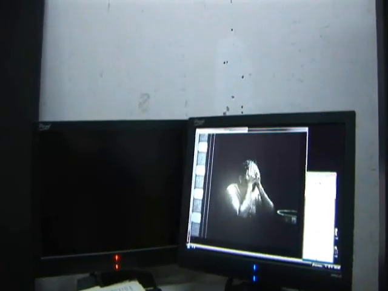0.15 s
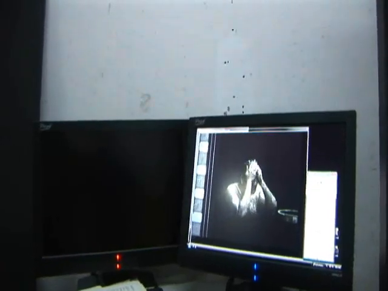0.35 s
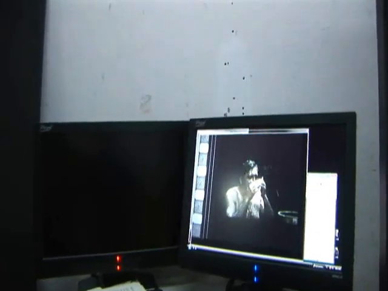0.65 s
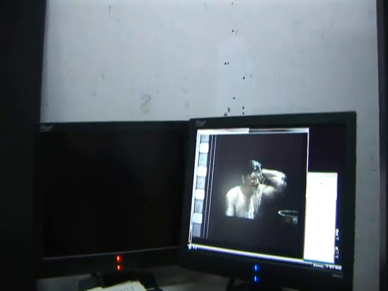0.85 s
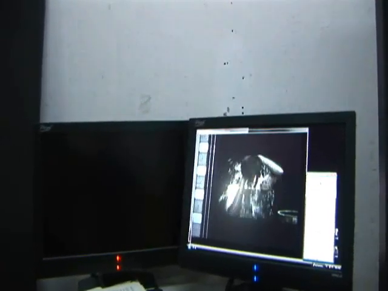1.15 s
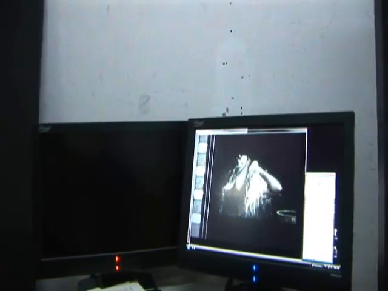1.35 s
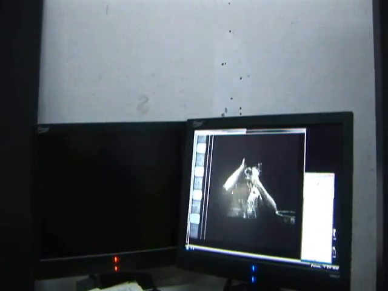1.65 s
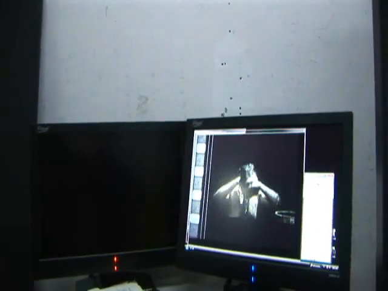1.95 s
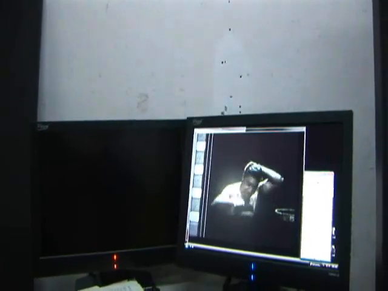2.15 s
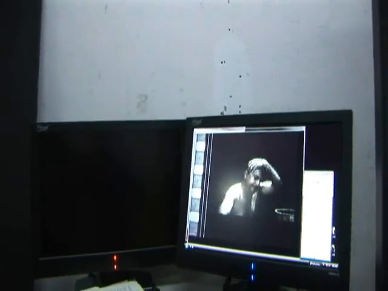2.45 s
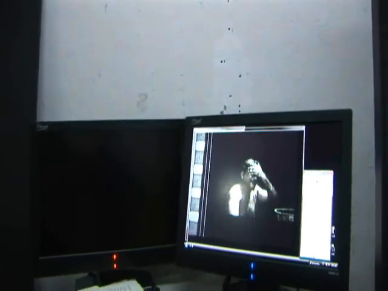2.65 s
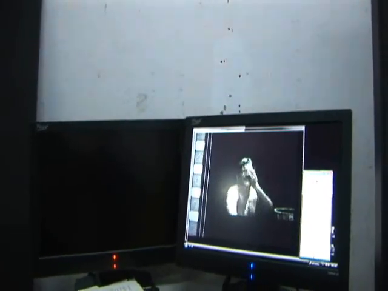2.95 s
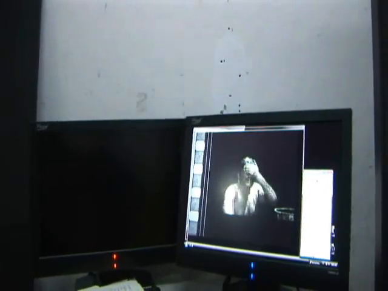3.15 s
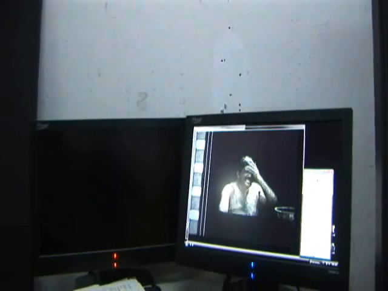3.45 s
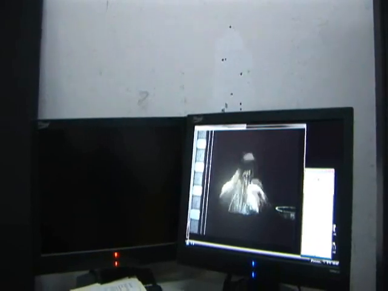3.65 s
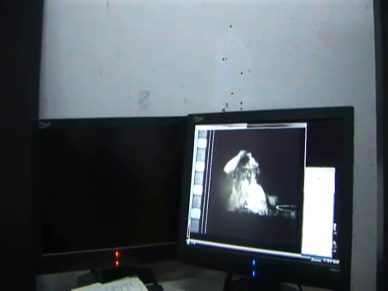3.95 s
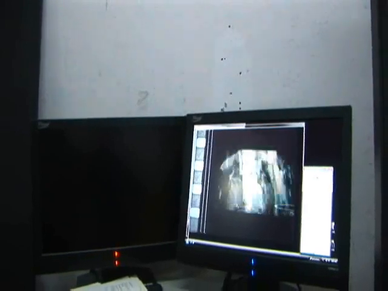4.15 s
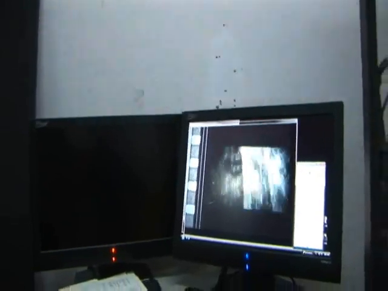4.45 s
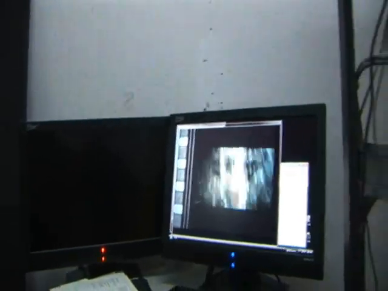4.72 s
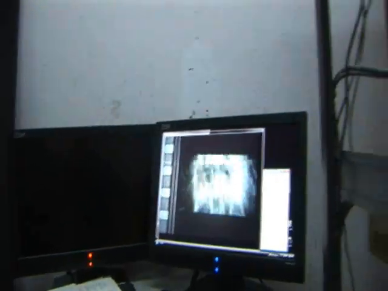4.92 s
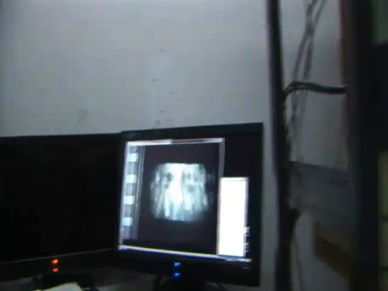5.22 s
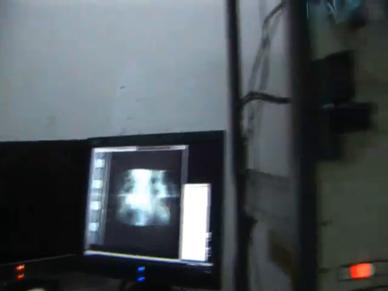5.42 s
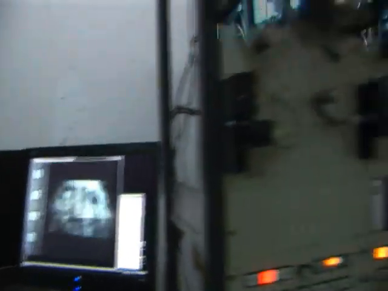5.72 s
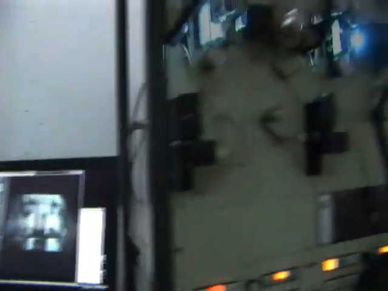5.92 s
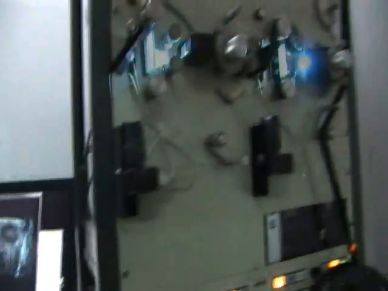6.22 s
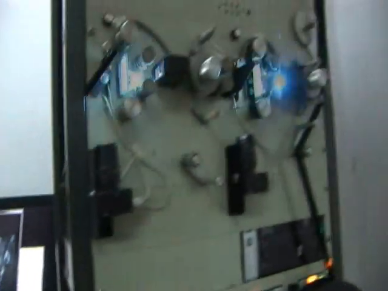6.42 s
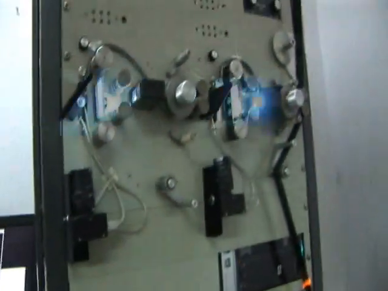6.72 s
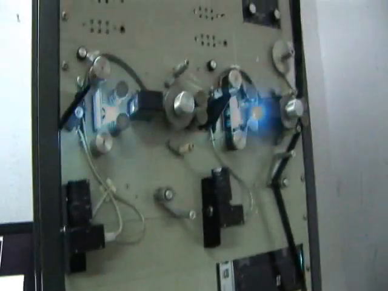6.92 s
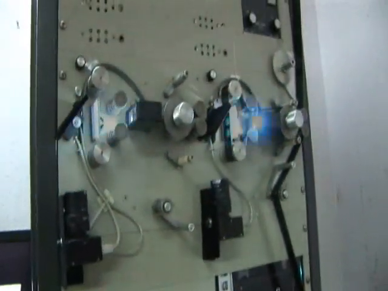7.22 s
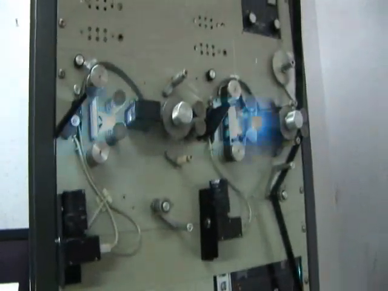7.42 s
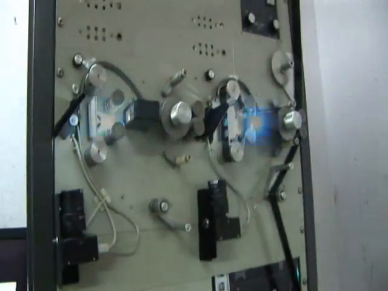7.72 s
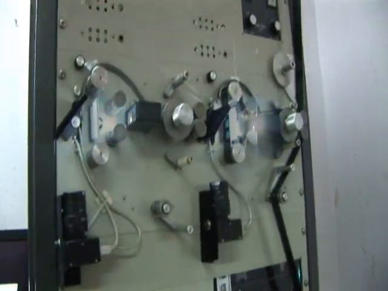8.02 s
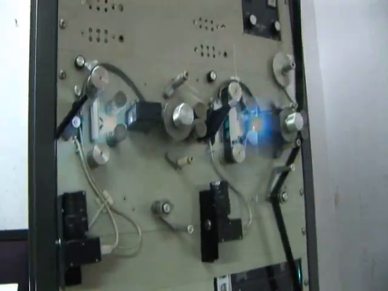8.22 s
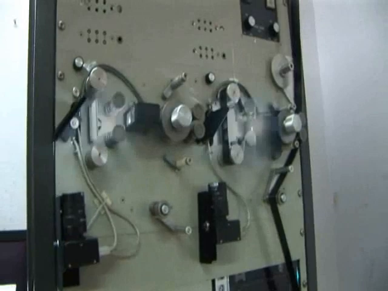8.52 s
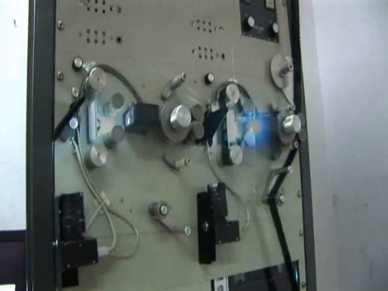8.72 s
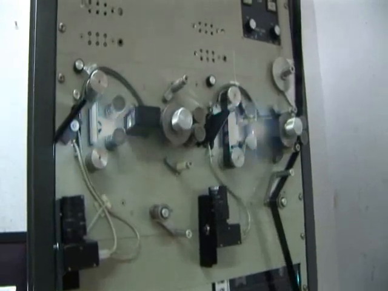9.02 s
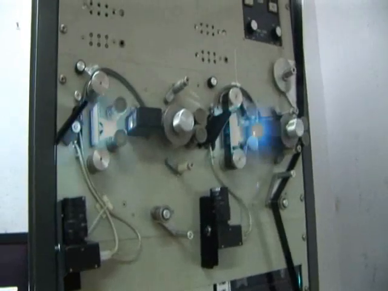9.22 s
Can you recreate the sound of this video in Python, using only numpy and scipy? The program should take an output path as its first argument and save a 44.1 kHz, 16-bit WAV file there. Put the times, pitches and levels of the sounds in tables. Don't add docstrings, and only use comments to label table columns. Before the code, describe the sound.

A steady low machine hum and rushing fans, with a hissing film-drag swish and metallic pin snaps repeating about every 1.3 seconds.

```python
import sys
import numpy as np
from scipy import signal
from scipy.fft import rfft, irfft, next_fast_len
from scipy.io import wavfile
from scipy.ndimage import uniform_filter1d, map_coordinates

SR = 44100
rng = np.random.default_rng(int(sys.argv[2]) if len(sys.argv) > 2 else 0)


def linear_from_db(decibels):
    return 10 ** (np.asarray(decibels, float) / 20)


def unload_audio(sound):
    columns = np.transpose(np.atleast_2d(sound))
    steps = np.round(np.clip(columns, -1, 1) * 32767)
    wavfile.write(sys.argv[1], SR, steps.astype(np.int16))


N = 413216

# time [s], share of the turn done [0-1].
TURN = [
    (0, 0),
    (5, 0),
    (6.8, 1),
    (9.37, 1),
]
# frequency [Hz], phase [radians].
LAG = [(100, .02), (400, .08), (1300, .15), (3300, .01)]
# frequency [Hz], left-right difference [dB].
HISS_SIDE = [(6000, 6), (7000, 3), (9300, 2), (10500, -8), (11600, -2.5), (13000, -0.5), (15500, -1)]
# start [s], peak level [dB], ring pitch [Hz], ring relative to the peak [dB].
PINS = [(0.2823, -21, 2450, -13), (0.3337, -27, 2460, -10), (0.9577, -24, 2640, -12), (1.05, -31, 2910, -7),
        (1.6277, -21.5, 2490, -14), (2.2789, -19.5, 2920, -11), (2.4643, -33, 2880, -7),
        (2.935, -17, 2440, -11), (3.5627, -21, 3100, -16), (3.6656, -26, 2390, -10),
        (4.253, -30, 2450, -3.5), (4.882, -23, 2890, -6.5), (4.966, -23.5, 2900, -11),
        (5.093, -22, 2490, -8), (5.5718, -21, 2476, -6.5), (6.1968, -24.5, 2870, -5),
        (6.2851, -28, 2810, -9), (6.413, -20, 2520, -11), (6.5136, -16, 2370, -16),
        (6.885, -21.5, 2536, -7), (7.371, -28, 2670, -11), (7.431, -31, 2650, -5.5),
        (7.5098, -24, 2610, -8), (7.5865, -20, 2276, -8), (7.7257, -9.5, 2490, -13),
        (8.209, -21, 2450, -6.5), (8.752, -27.5, 2670, -6.5), (8.9174, -19, 3055, -11),
        (9.0462, -17, 2640, -12), (9.1127, -17, 2350, -5)]
SMOOTH_DB = 0.3


def unit(x):
    return x / np.sqrt(np.mean(x ** 2) + 1e-20)


def along(points, hz):
    f, v = np.transpose(points)
    return np.interp(np.log(hz + 1), np.log(f + 1), v)


def curves(rows):
    s, *cols = np.transpose(rows)
    return [np.interp(np.arange(N) / SR, s, c) for c in cols]


def wobble(rate):
    knots = rng.standard_normal(int(N * rate / SR) + 4)
    return map_coordinates(knots, [np.arange(N) * rate / SR])


def coloured(colour):
    return lambda hz: linear_from_db(along(colour, hz))


def rush(gain, side_db, patchy_db):
    z = signal.stft(rng.standard_normal((2, N)), nperseg=512)[2]
    patches = uniform_filter1d(rng.standard_normal(z.shape[1:]), size=5, axis=0)
    patches = uniform_filter1d(patches, size=8, axis=1)
    pair = signal.istft(z * linear_from_db(patchy_db * unit(patches)), nperseg=512)[1][:, :N]
    m = next_fast_len(N)
    hz = np.fft.rfftfreq(m, 1 / SR)
    balance = [np.ones_like(hz), linear_from_db(along(side_db, hz))]
    mid, side = irfft(rfft(pair, m) * gain(hz) * balance, m)[:, :N]
    ports = rfft([mid + side, mid - side], m) * np.exp(1j * along(LAG, hz) * [[-1], [1]])
    return irfft(ports, m)[:, :N] / np.std(mid)


def tone(hz, wander, lag, swing=0):
    phase = 2 * np.pi * (hz * np.arange(N) / SR + rng.random()) + wander * wobble(1.99) + swing
    return np.sqrt(2) * np.sin(phase + np.array([[-lag], [lag]]))


def drive():
    # time [s], hum level [dB], low fan throb level [dB].
    levels = [(0.0, -39, -51), (1.07, -39, -50), (3.86, -39, -59), (4.07, -39, -71), (4.23, -39.5, -60),
              (5.04, -38, -71), (5.3, -37, -56), (5.64, -36.5, -55), (6.08, -35.5, -72), (6.13, -35, -62),
              (7.07, -35, -57), (7.44, -34.5, -82), (8.11, -35, -69), (8.69, -35, -55), (9.29, -35, -54),
              (9.37, -34.5, -70)]
    order_db = [-19, -22.5, -23.5, -23, -17, -33, -20, -26, -21, -22.5, -21.5, -18.5, -52, -43, -29.5,
                -26.5, -19.5, -32, -31, -31]
    shaft_hz, throb_hz = 16.341, 47.1
    hum_hz = 6 * shaft_hz
    hum_db, throb_db = curves(levels)
    uneven = 0.27 * np.sin(2 * np.pi * shaft_hz * np.arange(N) / SR)
    hum = linear_from_db(hum_db) * tone(hum_hz, wander=0.038, lag=along(LAG, hum_hz), swing=uneven)
    overtones = 0
    for k, db in enumerate(order_db, start=8):
        overtones = overtones + linear_from_db(db + 0.82 * wobble(1.51)) * tone(k * shaft_hz, wander=0.4, lag=0.0016 * k)
    duller_db = -2 * curves(TURN)[0]
    throb = linear_from_db(throb_db) * tone(throb_hz, wander=0.3, lag=0.03)
    return hum + linear_from_db(-37 + duller_db) * overtones + throb


def fans():
    blade_hz = [120.5, 137.3, 177.6, 209.9, 223.4, 226.1, 275.9, 282, 308.2, 421.9, 463, 723.4]
    # rms of that tone facing away [dB], facing the machine [dB].
    blade_db = [(-64, -63), (-79, -55.5), (-54, -55), (-55, -70), (-57.5, -62), (-55.5, -63), (-52, -52),
                (-59, -66), (-59.5, -64), (-61, -60), (-74, -57.5), (-64, -65)]
    # frequency [Hz], density [dB per Hz].
    air_colour = [(31, -8), (40, -15), (66, -6), (110, -2.5), (250, -3), (450, -2.5), (620, -9.5),
                  (1000, -4), (1500, -10.5), (3300, -13), (4600, -21.5), (5150, -27.5), (6100, -26.5),
                  (6500, -45)]
    # frequency [Hz], left-right difference [dB].
    air_side = [(60, -77), (200, -9.5), (400, -5), (700, -2.5), (2000, -7), (3250, -14), (3800, 0.5),
                (5000, 0), (6500, 10)]
    # time [s], level [dB].
    leak_level = [(0, -53), (2, -54.5), (4.5, -53), (5.9, -56), (7.2, -60), (8.5, -62.5), (9.37, -56)]
    # frequency [Hz], density [dB per Hz].
    leak_colour = [(9200, -45), (9800, -8), (11500, 2), (14500, 4), (15600, -0.5)]
    turn = curves(TURN)[0]
    blades = 0
    for hz, (away_db, facing_db) in zip(blade_hz, blade_db):
        level_db = away_db + (facing_db - away_db) * turn + 2.1 * wobble(6)
        blades = blades + linear_from_db(level_db) * tone(hz, wander=0.0032 * hz, lag=along(LAG, hz))
    air = linear_from_db(-44 - 0.09 * turn) * rush(coloured(air_colour), air_side, patchy_db=0.86)
    leak_db = curves(leak_level)[0] + 0.78 * wobble(5)
    leak = linear_from_db(leak_db) * rush(coloured(leak_colour), HISS_SIDE, SMOOTH_DB)
    whine_hz, whine_wide_hz = 5200, 250
    whine = rush(lambda hz: 1 / (1 + (2 * (hz - whine_hz) / whine_wide_hz) ** 4), air_side, SMOOTH_DB)
    return blades + air + leak + linear_from_db(-64 + 1.3 * turn) * whine


def effort(shapes, strengths, tail, rest_db, extra=(), drags=0):
    # creep late [s], lift drags on [s], return late [s].
    slips = [(0, 0, 0.0047), (0.054, 0.079, -0.00074), (-0.013, 0.022, 0.017), (0.0077, 0, 0.012),
             (0.0052, 0, 0.0052), (0.035, 0.012, -0.0063), (-0.015, 0, 0.0069), (0.024, 0.01, -0.012)]
    # rise [dB per s], hold [s], fall [dB per s].
    puff_shape = (190, 0.037, 430)
    first_pull_s, frame_s = -0.052, 1.3125
    moves = [(s, db, *puff_shape) for s, db in extra]
    for frame, row in enumerate(strengths):
        creep, drag, back = slips[frame]
        late = [creep, 0, 0, 0, back]
        longer = [-creep, drags * drag, 0, 0, 0]
        pull_s = first_pull_s + frame * frame_s
        for (after, rise, hold, fall), db, slip, more in zip(shapes, row, late, longer):
            moves.append((pull_s + after + slip, db, rise, max(hold + more, 0), fall))
    t = np.arange(0, N + 64, 64) / SR
    power = linear_from_db(2 * rest_db)
    tail_db, tail_fall = tail
    for s, db, rise, hold, fall in moves:
        past = np.maximum(t - s - hold, 0)
        onset = linear_from_db(2 * (db + rise * np.minimum(t - s, 0)))
        power = power + onset * (linear_from_db(-2 * fall * past) + linear_from_db(2 * (tail_db - tail_fall * past)))
    return np.interp(np.arange(N) / SR, t, 10 * np.log10(power))


def jolts():
    kicks, t = np.zeros(N), np.arange(SR // 5) / SR
    for s, db, *_ in PINS:
        kicks[round(s * SR)] = linear_from_db(db - 19)
    return signal.fftconvolve(kicks, linear_from_db(-60 * t / 0.24))[:N]


def strokes():
    # peak after the pull [s], rise [dB per s], hold [s], fall [dB per s].
    scrape_shapes = [
        (-.37, 86, .1, 90),
        (-.215, 309, .015, 159),
        (-.085, 500, 0.024, 83),
        (.002, 150, 0.017, 161),
        (.385, 198, 0.023, 103),
    ]
    air_shapes = [
        (-.4, 61, .15, 90),
        (-.225, 537, .015, 140),
        (-.095, 600, 0.017, 160),
        (-.02, 250, 0.033, 150),
        (.335, 250, 0.11, 130),
    ]
    # creep, lift, grip, pull, return [dB].
    scrape_strengths = [(-44, -33, -32, -23.5, -35), (-45, -33.5, -34, -26.5, -36),
                        (-44, -33.5, -32, -25, -33.5), (-42.5, -29, -30.5, -26, -37),
                        (-41, -29.5, -28.5, -26.5, -33.5), (-39, -27.5, -27, -24, -33.5),
                        (-41, -26, -29.5, -23, -36.5), (-38, -29, -30.5, -23, -36)]
    air_strengths = [(-55, -38, -40, -36, -48.5), (-55, -37, -39, -37, -51.5), (-55, -39, -36, -36, -46.5),
                     (-54, -36, -37, -36, -49.5), (-52.5, -35.5, -35, -35, -46),
                     (-60, -37, -37.5, -37, -52), (-58, -37, -39, -36.5, -51.5),
                     (-54, -37.5, -40, -37, -52)]
    # time [s], air level [dB].
    puffs = [(.7, -54.5), (1.88, -57), (3.2, -54), (4.72, -55), (5.74, -55), (7.25, -56), (8.64, -59)]
    # frequency [Hz], width [Hz], level [dB].
    plate_modes = [(1320, 150, -32), (1780, 180, -2), (2087, 235, -1.5), (2450, 190, -2.5),
                   (2980, 400, -1.5), (3200, 620, -4.5), (4080, 93, -4.5), (5010, 270, -1)]
    # frequency [Hz], density [dB per Hz].
    scrape_colour = [(290, -42), (500, -17), (863, -21), (1280, 2.5), (1510, -7), (2480, -1.5), (2690, -5),
                     (4080, -7.5), (6720, -28), (8000, -29.5), (10400, -34), (17600, -120)]
    hiss_colour = [(8800, -32), (9600, -3), (11300, 0.5), (13000, -1.5), (14700, -0.5), (15600, -3)]
    loop_colour = [(400, -40), (750, -4), (1100, -2), (1400, -1), (2000, -18), (3000, -29)]
    rustle_colour = [(5000, -9.5), (6000, 7), (6800, -8), (8200, 2.5), (9400, -1.5), (9900, -30)]
    # frequency [Hz], left-right difference [dB].
    scrape_side = [(500, -3.5), (1500, -5), (2600, -7), (3250, -12), (3800, -2.5), (4500, 0.5), (6000, 6.5),
                   (8000, 2.5)]

    # (dB, fall in dB per s)
    scrape_db = effort(scrape_shapes, scrape_strengths, tail=(-7, 61.4), rest_db=-64.5, drags=1)
    air_tail = (-17, 47)
    hiss_db = effort(air_shapes, air_strengths, air_tail, rest_db=-57.5, extra=puffs)
    full_flow_db = -36
    flow_db = effort(air_shapes, air_strengths, air_tail, rest_db=-60, extra=puffs) - full_flow_db
    rustle_db = -43 + 1.064 * flow_db

    def plate(hz):
        modes = sum(linear_from_db(2 * db) / (1 + (2 * (hz - c) / w) ** 2) for c, w, db in plate_modes)
        return np.sqrt(0.11 + modes)

    chatter = linear_from_db(0.38 * wobble(140) + 0.87 * wobble(35))
    scrape = unit(chatter) * rush(lambda hz: linear_from_db(0.61 * along(scrape_colour, hz)) * plate(hz),
                                  scrape_side, patchy_db=1.5)
    hiss = rush(coloured(hiss_colour), HISS_SIDE, SMOOTH_DB)
    rustle = rush(coloured(rustle_colour), HISS_SIDE, SMOOTH_DB)
    jolt = jolts()
    open_gate = linear_from_db(hiss_db) ** 2 / (linear_from_db(hiss_db) + linear_from_db(-60.0))
    loop = linear_from_db(-5.5) * open_gate * rush(coloured(loop_colour), scrape_side, patchy_db=5.0)
    hiss = np.hypot(linear_from_db(0.4) * open_gate, linear_from_db(-6.5) * jolt) * hiss
    rustle = np.hypot(linear_from_db(rustle_db + 0.8), linear_from_db(-16) * jolt) * rustle
    return loop + np.hypot(linear_from_db(scrape_db - 1.8), jolt) * scrape + hiss + rustle


def pins():
    out, t = np.zeros(N + SR), np.arange(SR // 5) / SR
    ring_t60_s = 0.16
    envelope = linear_from_db(-60 * t / ring_t60_s) * (1 - np.exp(-t / 0.002))
    for s, db, hz, ring_db in PINS:
        rattle = uniform_filter1d(rng.standard_normal((2, len(t))), size=170, axis=1)
        shake, rough = unit(rattle[0]), unit(rattle[1])
        ring = np.sin(2 * np.pi * hz * t + 0.8 * shake) * linear_from_db(1.8 * rough)
        lower = linear_from_db(-18.0) * np.sin(2 * np.pi * 0.78 * hz * t)
        upper = linear_from_db(-8.5) * np.sin(2 * np.pi * 1.36 * hz * t + 0.95 * rough)
        out[round(s * SR):][:len(t)] += linear_from_db(db + ring_db + 0.9) * (ring + lower + upper) * envelope
    return out[:N]


def room(x):
    # frequency [Hz], time to fall 60 dB [s].
    decay = [(500, 0.82), (2500, 0.87), (10000, 0.13)]
    hz, t, z = signal.stft(rng.standard_normal((2, SR // 2)), SR, nperseg=256)
    tail = signal.istft(z * linear_from_db(-60 * t / along(decay, hz)[:, None]), SR, nperseg=256)[1]
    return signal.fftconvolve(x[None], tail / np.linalg.norm(tail[0]), axes=1)[:, :N]


def scene():
    snaps = pins()
    transport = strokes() + snaps + linear_from_db(-10) * room(snaps)
    return drive() + fans() + transport * linear_from_db([[-0.4], [0.4]])


def band_limit(x):
    return signal.sosfilt(signal.butter(12, 15860, fs=SR, output="sos"), x)


def record(dry):
    top_hz = 15520
    m = next_fast_len(N + SR // 10)
    in_band = np.fft.rfftfreq(m, 1 / SR) < top_hz
    mix = irfft(rfft(dry, m) * in_band, m)[:, :N]
    return band_limit(mix)


dry = scene()
out = record(dry)
unload_audio(out)
```